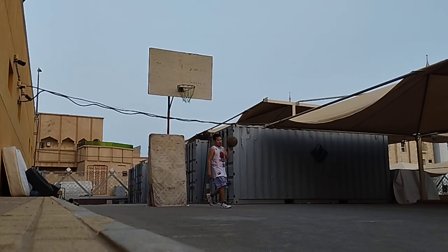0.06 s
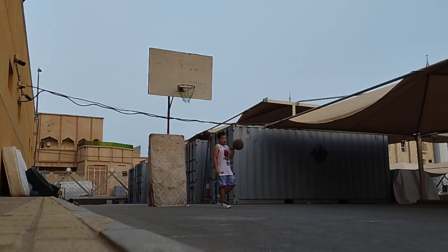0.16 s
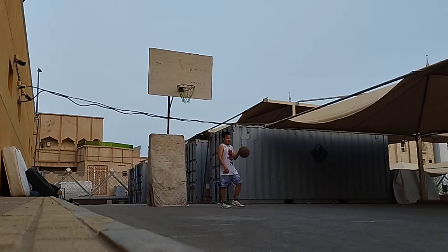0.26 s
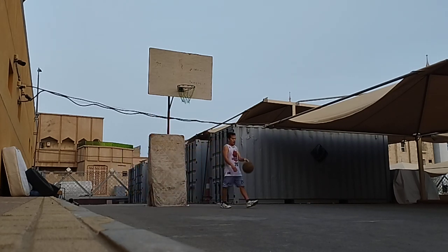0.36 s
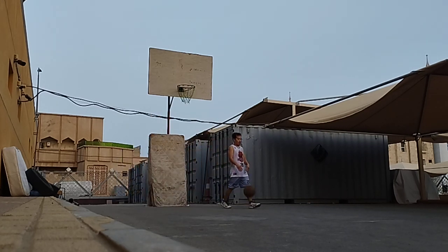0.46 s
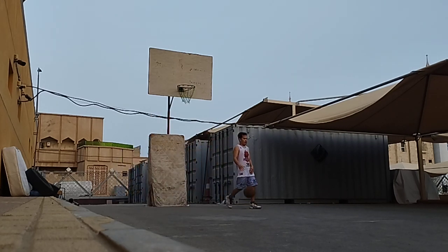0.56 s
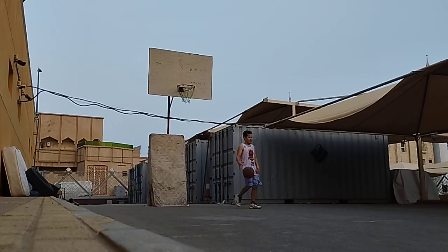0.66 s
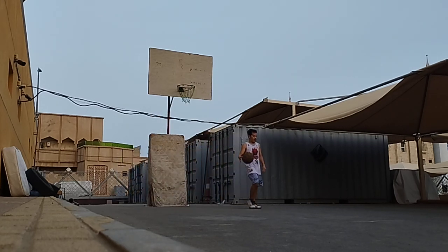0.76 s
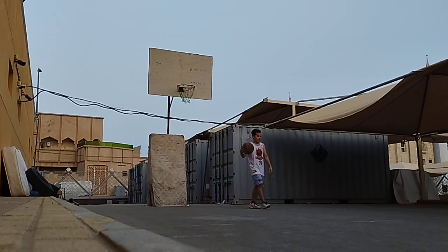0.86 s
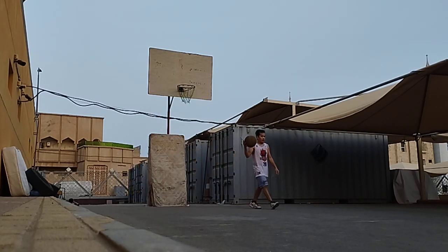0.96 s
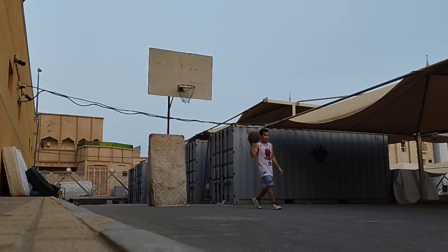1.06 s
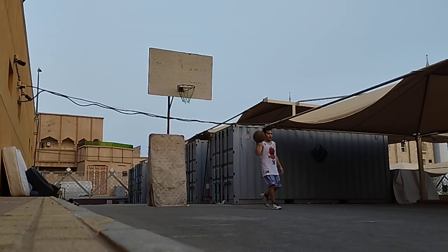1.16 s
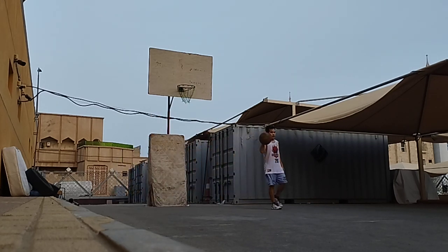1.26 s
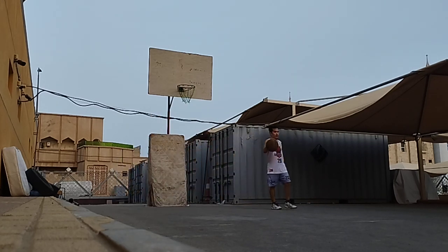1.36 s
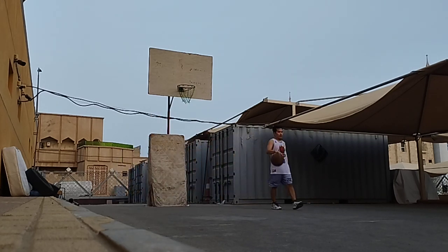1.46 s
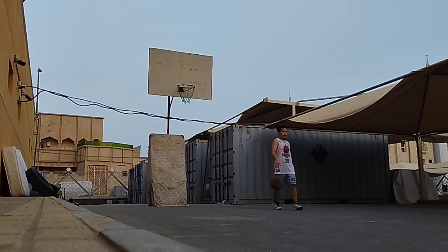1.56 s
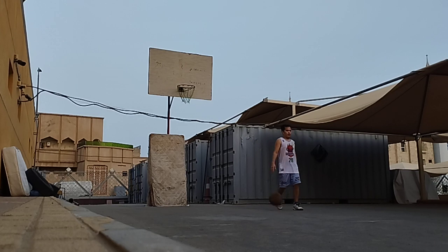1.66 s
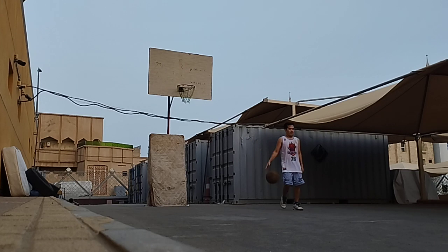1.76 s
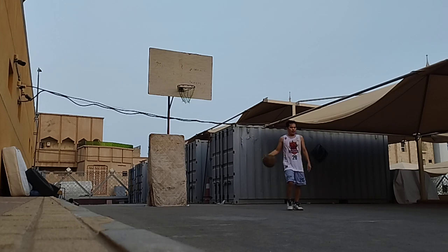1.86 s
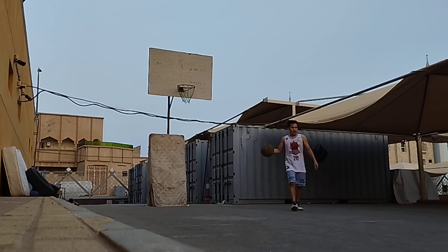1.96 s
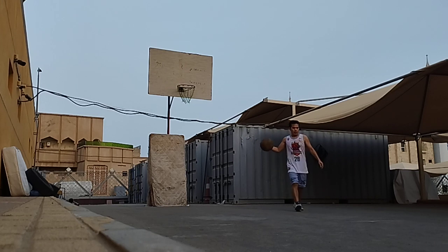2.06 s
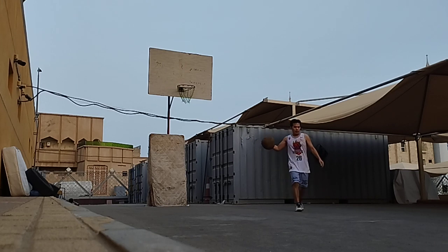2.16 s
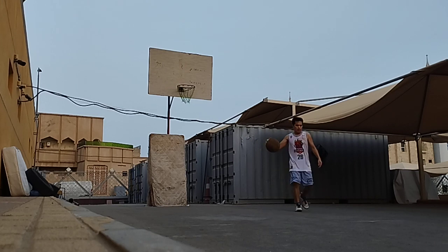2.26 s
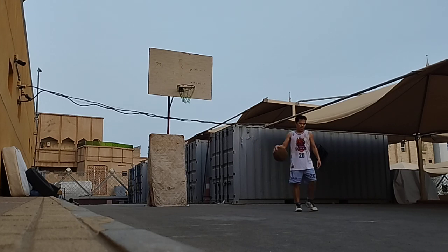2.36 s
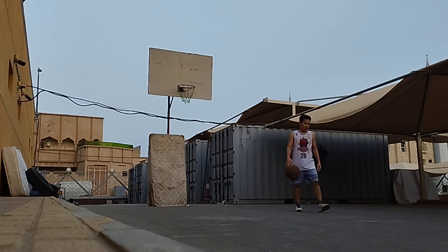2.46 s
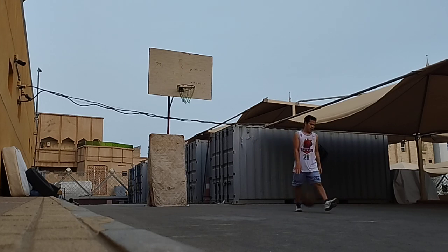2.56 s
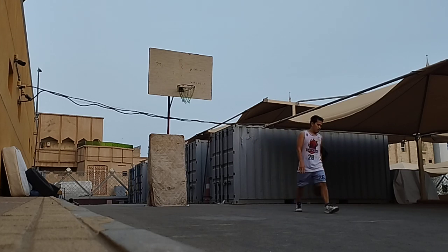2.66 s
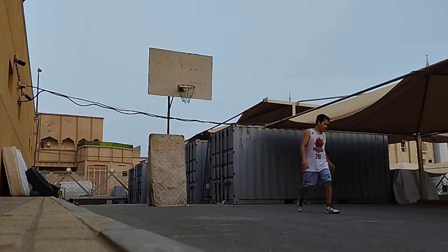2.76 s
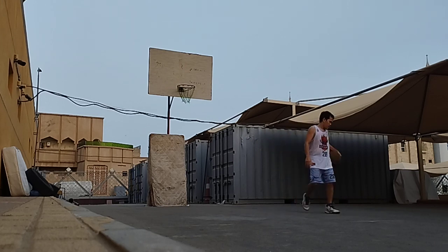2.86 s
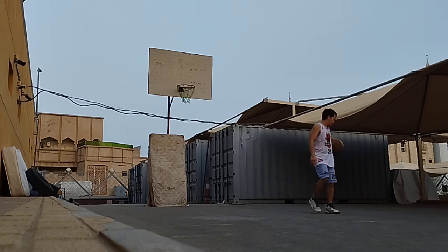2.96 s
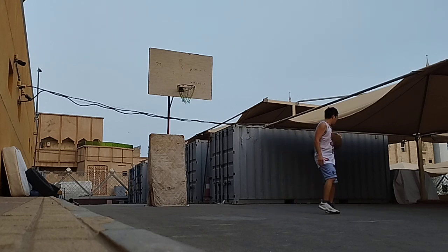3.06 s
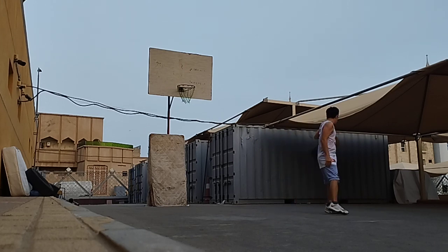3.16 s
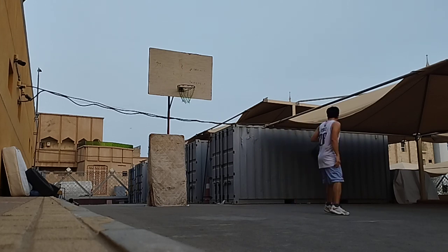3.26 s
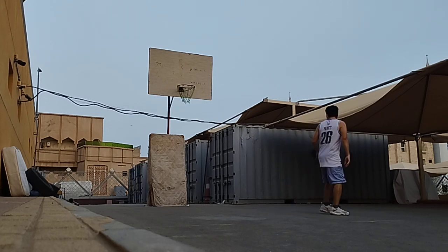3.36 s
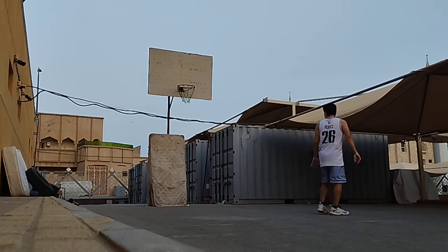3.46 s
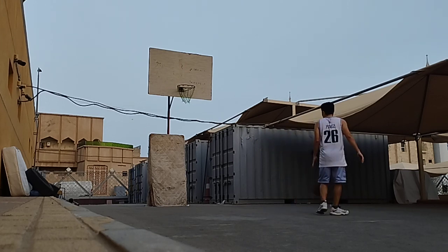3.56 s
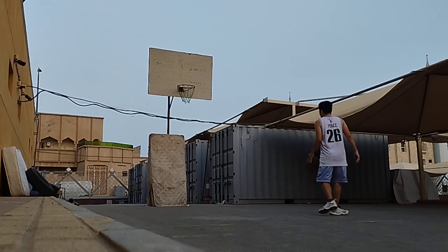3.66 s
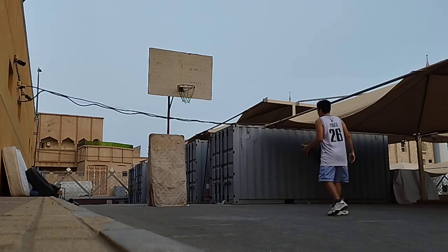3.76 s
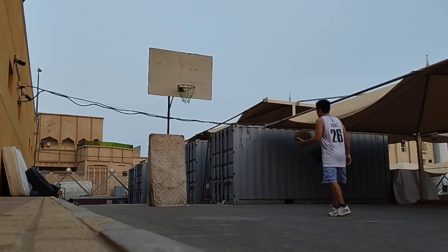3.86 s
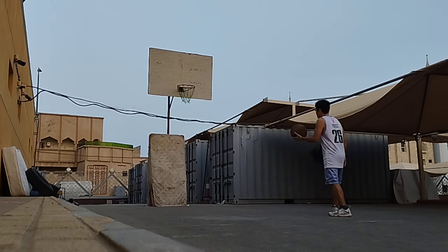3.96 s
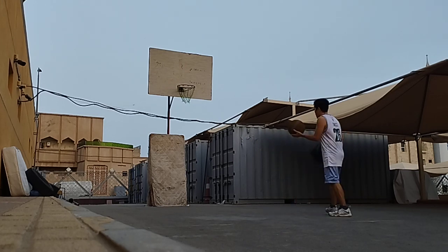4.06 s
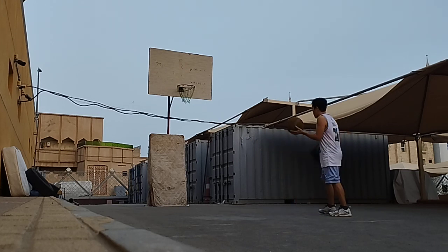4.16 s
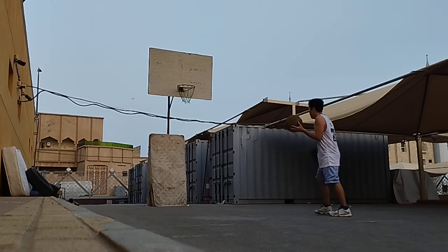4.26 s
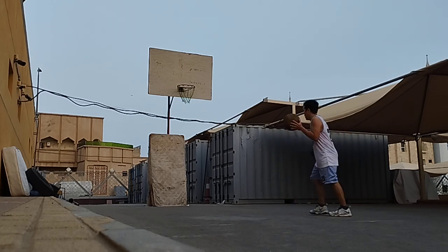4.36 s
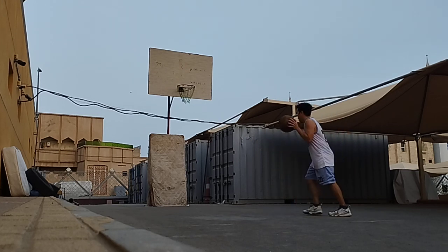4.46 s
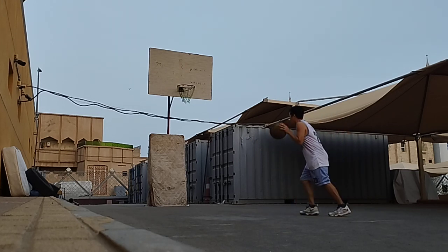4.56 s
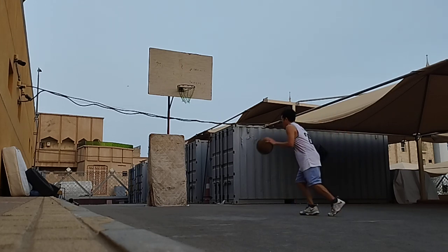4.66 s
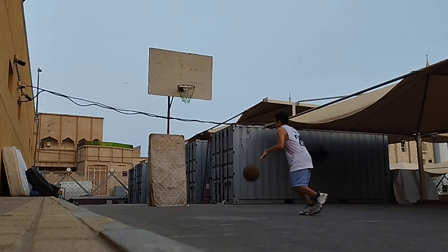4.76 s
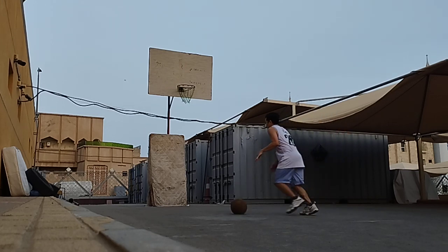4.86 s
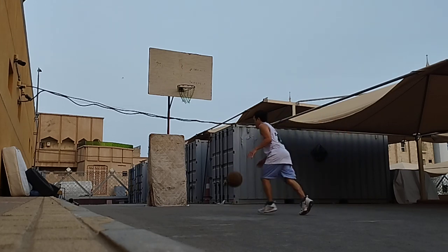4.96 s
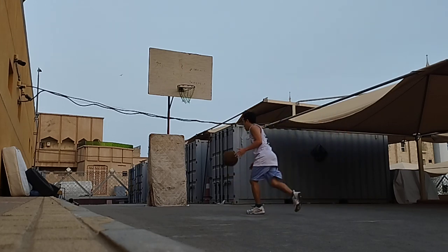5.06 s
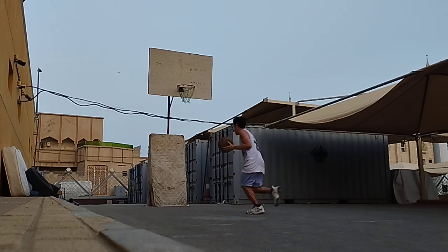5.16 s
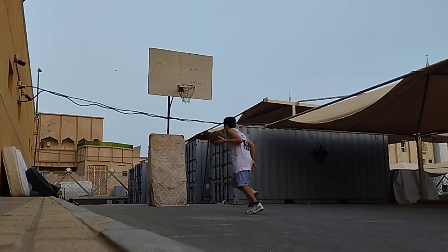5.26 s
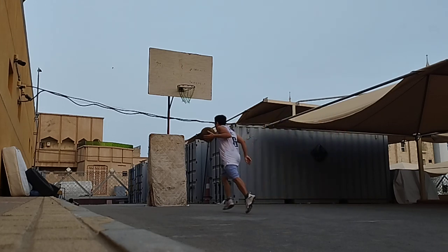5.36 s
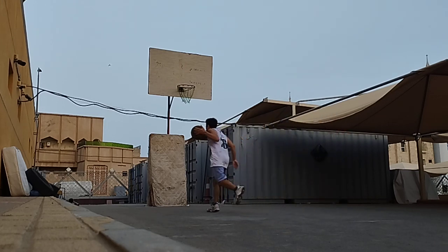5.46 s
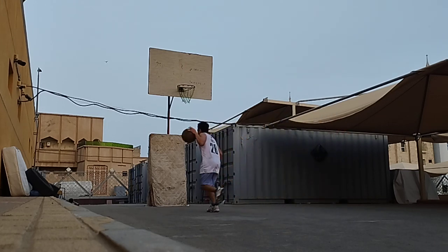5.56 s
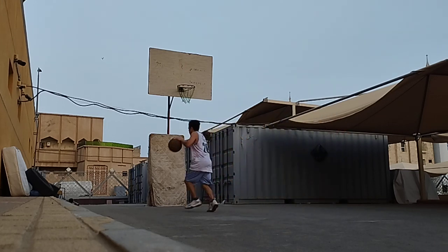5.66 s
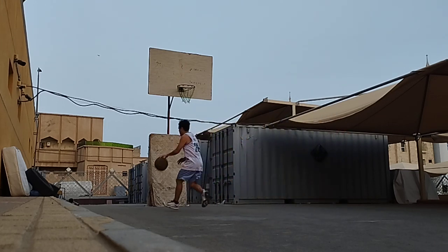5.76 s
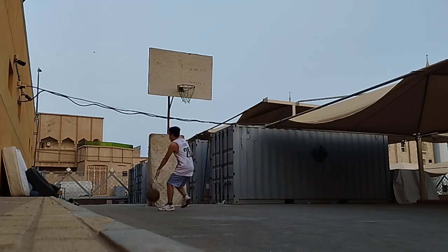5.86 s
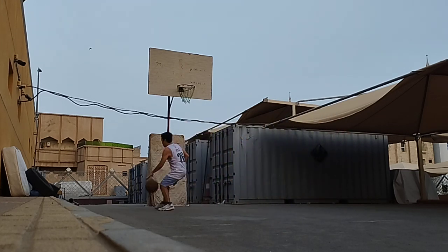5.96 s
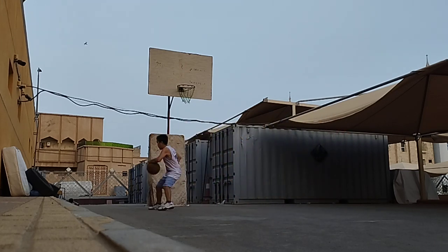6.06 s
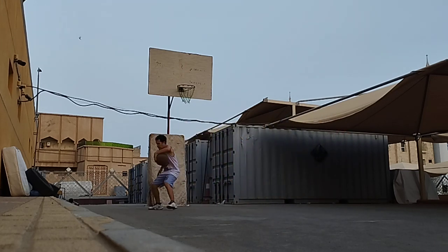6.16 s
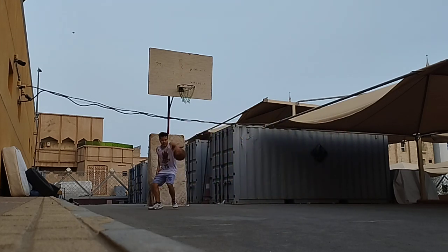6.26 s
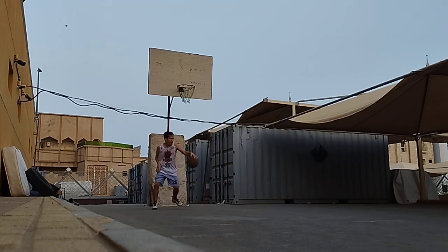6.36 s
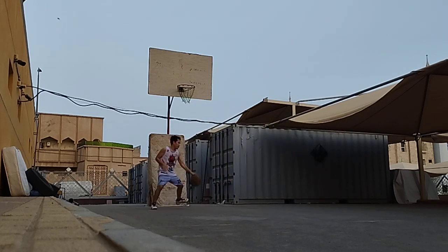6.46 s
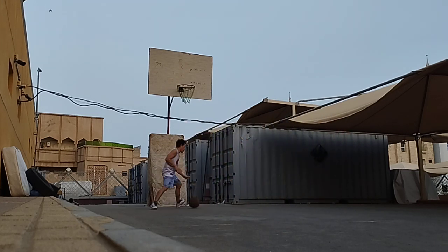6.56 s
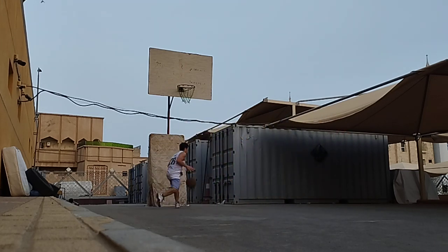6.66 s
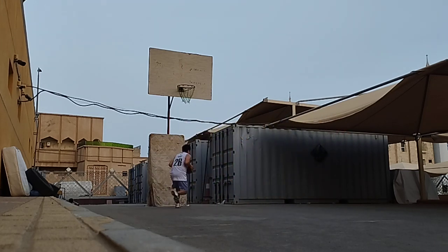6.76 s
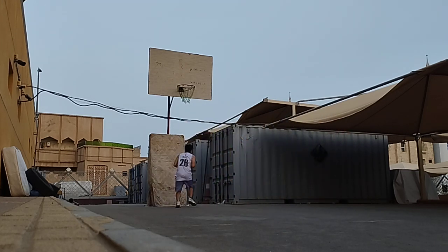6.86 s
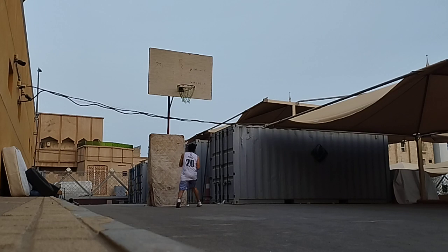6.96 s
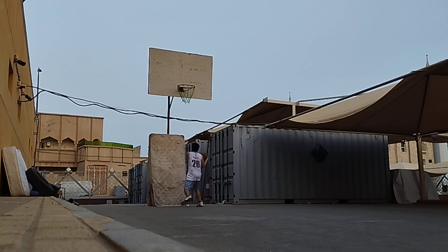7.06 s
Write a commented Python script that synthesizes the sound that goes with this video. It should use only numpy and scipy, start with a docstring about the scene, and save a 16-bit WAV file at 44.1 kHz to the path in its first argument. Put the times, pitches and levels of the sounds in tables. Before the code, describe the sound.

A basketball bounces seven times on hard outdoor concrete, each thump and rubbery slap ringing briefly off nearby walls, over a low town rumble.

```python
"""A basketball is dribbled on an outdoor concrete court, some metres from two close microphones on the ground.
The town hums throughout: filtered noise makes a rumble, a faint wash and a deep throb, strongest near 3.6 s.
Soles tap from the start: short noise bursts. From 0.6 s come seven bounces: a thump of the squashed ball, a
rubber slap and a short ring of shell and air, answered by a steel container and house walls.
From 3.3 s shoes also scuff on the gritty court, and low thuds of noise mark planted heels and one wall echo."""
import sys
import numpy as np
from scipy import signal
from scipy.fft import rfft, irfft, next_fast_len
from scipy.io import wavfile
from scipy.ndimage import map_coordinates

SR = 44100
rng = np.random.default_rng(int(sys.argv[2]) if len(sys.argv) > 2 else 0)


def to_wav(sig):
    """Store sig (one row per channel, or 1-D mono) as 16-bit WAV at the path in sys.argv[1].

    Samples outside -1..1 are clipped; the rate is SR.
    """
    pcm = np.clip(np.atleast_2d(sig), -1, 1) * 32767
    pcm = np.round(pcm).astype(np.int16)
    wavfile.write(sys.argv[1], SR, pcm.T)  # frames by channels


N = 313110  # length in samples, 7.1 s


def amp(db):
    """Turn decibels into a gain."""
    return 10 ** (np.asarray(db) / 20)


def unit(x):
    """Scale to an rms (average strength) of 1."""
    return x / np.sqrt(np.mean(x ** 2) + 1e-20)


def along(points, hz):
    """Read a table of (Hz, value) on a log frequency axis, as pitch is heard."""
    f, v = np.transpose(points)
    return np.interp(np.log(hz + 1), np.log(f + 1), v)


def curve(rows, s):
    """Read a table of (seconds, value) at time s."""
    return np.interp(s, *np.transpose(rows))


def wobble(rate):
    """A smooth random curve with `rate` random points a second."""
    points = rng.standard_normal(int(N * rate / SR) + 4)
    return map_coordinates(points, [np.arange(N) * rate / SR])


def filtered(x, response):
    """Multiply the spectrum of x by a response that depends on frequency."""
    n = x.shape[-1]
    m = next_fast_len(n + SR // 4)  # spare room so the end does not wrap round to the start
    spectrum = rfft(x, m) * response(np.fft.rfftfreq(m, 1 / SR))
    return irfft(spectrum, m)[..., :n]


def causal(points, size=2048):
    """The sharpest click (minimum phase) with the given spectrum, peak 1."""
    cepstrum = irfft(np.log(amp(along(points, np.fft.rfftfreq(size, 1 / SR)))))
    # fold the second half onto the first, so nothing sounds before the hit
    cepstrum[1:size // 2] *= 2
    cepstrum[size // 2 + 1:] = 0
    click = irfft(np.exp(rfft(cepstrum)))
    return click / np.abs(click).max()


def butter(x, hz, kind, order):
    """A high- or low-pass filter that works forward in time."""
    return signal.sosfilt(signal.butter(order, hz, kind, fs=SR, output="sos"), x)


def panned(db):
    """Left and right gains that make the left louder than the right by db."""
    return amp([[db / 2], [-db / 2]])


def add(track, s, sound):
    """Mix a sound into the track at time s."""
    i = max(round(s * SR), 0)
    n = min(sound.shape[-1], N - i)
    track[:, i:i + n] += sound[..., :n]


# How alike left and right are. Each row: frequency in Hz, likeness from -1 (opposite) to 1 (the same).
LEFT_RIGHT_LIKENESS = [(60, 0.99), (130, 0.88), (290, 0.77), (640, 0.21), (1410, -0.21), (3100, 0.16),
                       (6820, -0.11), (15000, -0.031)]


def pair(n):
    """Noise as two close microphones hear it: alike in the bass, nearly unrelated in the treble."""
    def shares(hz):
        turn = np.arccos(np.clip(along(LEFT_RIGHT_LIKENESS, hz), -1, 1)) / 2
        return np.array([np.cos(turn), np.sin(turn)])
    mid, side = filtered(rng.standard_normal((2, n)), shares)
    return np.array([mid + side, mid - side])


def rush(spectrum):
    """Stereo noise coloured by a spectrum, rms 1."""
    return unit(filtered(pair(N), lambda hz: amp(along(spectrum, hz))))


# Spectra of the town's three layers. Each row: frequency in Hz, relative level in dB.
THROB_SPECTRUM = [(10, -27), (22, -9), (31, 0), (34, -3), (40, -10.5), (52, -15), (75, -38), (200, -96)]
RUMBLE_SPECTRUM = [(25, -63), (50, 2.5), (68, 2.5), (115, -2), (160, -8.5), (240, -10.5), (330, -33),
                   (900, -92)]
WASH_SPECTRUM = [(120, -46), (230, 0), (480, -4), (1000, -13.5), (1500, -18.5), (1950, -19.5),
                 (2500, -27.5), (4000, -36.5), (5000, -38), (6300, -43.5), (8000, -50.5), (10500, -52),
                 (13000, -50.5), (16000, -46.5)]
# Loudness of the deep throb over time. Each row: time in seconds, level in dB.
THROB_LEVEL = [(0, -39.5), (1.5, -38.5), (3.6, -33), (4.7, -41.5), (7.1, -38)]
RUMBLE_DB, WASH_DB = -40.5, -48


def town():
    """Distant traffic and machinery: a deep throb that swells and sinks, a rumble and a faint wash."""
    deep = amp(curve(THROB_LEVEL, np.arange(N) / SR)) * rush(THROB_SPECTRUM) * panned(0.85)
    rumble = amp(RUMBLE_DB + 0.93 * wobble(7)) * rush(RUMBLE_SPECTRUM) * panned(0.39)
    wash = amp(WASH_DB + 0.14 * wobble(6.2)) * rush(WASH_SPECTRUM) * panned(0.46)
    return deep + rumble + wash


# light footfalls, uneven in time and weight, louder as time goes on
STEPS_PER_S, STEP_SCATTER_S, STEP_DB, STEP_DB_PER_S, STEP_SCATTER_DB = 2.2, 0.066, -70.5, 1.5, -0.5


def light_steps():
    """The quiet footfalls as rows of time in seconds and level in dB."""
    beats = np.arange(1, 16) / STEPS_PER_S
    late, heavy = rng.standard_normal((len(beats), 2)).T
    times = np.clip(beats + STEP_SCATTER_S * late, 0, (N - 1) / SR)
    levels = STEP_DB + STEP_DB_PER_S * beats + STEP_SCATTER_DB * heavy
    return list(zip(times, levels))


# The clearest taps of soles and of the hand on the ball. Each row: start in seconds, level in dB.
CLEAR_TAPS = [(0.0623, -63.5), (1.5688, -65), (1.6248, -49.5), (3.871, -59.5), (4.0711, -57.5),
              (5.5677, -44), (5.9327, -56.5), (6.3944, -58.5), (6.847, -56)]
# Soles sliding on grit. Each row: start in seconds, level in dB, length in seconds.
SOLE_SCUFFS = [(3.3, -64, 0.09), (3.376, -55.5, 0.073), (3.93, -66, .14), (4.614, -65.5, 0.092),
               (5.151, -53.5, 0.027), (5.565, -46.5, 0.031), (5.727, -61.5, 0.053), (6.103, -60.5, 0.077),
               (6.488, -49, 0.044), (6.624, -62.5, .06), (6.688, -55.5, 0.086), (7.079, -46.5, 0.044)]
# Low thuds: heels planted hard and, at 3.738, a house wall's low echo of the bounce.
# Each row: start in seconds, level in dB.
LOW_THUDS = [(3.738, -42), (5.153, -42), (5.959, -32.5), (6.883, -36.5)]
# Spectra of a tap, a scuff and a low thud. Each row: frequency in Hz, relative level in dB.
TAP_SPECTRUM = [(200, -14), (2000, -6), (3500, 0), (5000, 1.5), (7000, 1.5), (8500, -16), (11000, -17),
                (13000, -1.5), (16000, -19)]
GRIT_SPECTRUM = [(200, -17), (1000, 3), (2100, -0.5), (2900, -2.5), (6300, -6), (8200, -20), (11000, -22),
                 (13000, -14), (16000, -16)]
THUD_SPECTRUM = [(100, -22), (300, 5), (700, -2), (1200, -12), (2500, -32), (8000, -47)]
TAP_T60_S, THUD_T60_S = 0.039, 0.049  # t60: time to fade by 60 dB
BITE_SHARE, SLIDE_SHARE, RELEASE_SHARE = .2, 0.89, 1.5  # a scuff's attack, end of slide and t60 over its length


def footwork_and_thuds():
    """Taps, scuffs over loose grit and low thuds (heels, one wall echo): noise shaped by short, fading levels."""
    t = np.arange(SR // 4) / SR
    touch, drag, thud = np.zeros((3, 1, N))
    for s, db in CLEAR_TAPS + light_steps():
        add(touch, s, amp(db - 60 * t / TAP_T60_S))
    for s, db, length in SOLE_SCUFFS:
        # the sole bites, slides and lets go; loose grains roll on
        bite = np.clip(t / (BITE_SHARE * length), 0, 1)
        after = np.maximum(t - SLIDE_SHARE * length, 0)
        add(drag, s, bite * amp(db - 60 * after / (RELEASE_SHARE * length)))
    for s, db in LOW_THUDS:
        add(thud, s, amp(db - 60 * t / THUD_T60_S) * (1 - np.exp(-t / 0.00061)))
    # grains catch and break loose unevenly
    grit = unit(rush(GRIT_SPECTRUM) * amp(3.2 * wobble(600) + 2.8 * wobble(70)))
    near = drag * grit + touch * rush(TAP_SPECTRUM) + thud * rush(THUD_SPECTRUM)
    return near + yard(near, tail_db=-13.5)[:, :N]


# Echoes of the container and the house walls. Each row: delay in seconds, relative level in dB,
# fading time in seconds (to 37 percent).
WALL_ECHOES = [(.008, -18, 0.014), (.036, -16.5, 0.0074), (0.055, -18.5, .014), (.1, -38, 0.0055),
               (.122, -25.5, .01), (0.158, -24, 0.016)]
# How long the tail lasts. Each row: frequency in Hz, time to fade by 60 dB in seconds.
TAIL_T60 = [(100, 0.56), (500, 0.87), (1200, 0.72), (4000, 0.76), (12000, 0.53)]
# Tone of all the echoes. Each row: frequency in Hz, gain in dB.
ECHO_COLOUR = [(60, -18.5), (150, 2), (400, -7.5), (700, -3), (1150, -1.5), (2000, 1.5), (3200, 2.5),
               (6000, -5.5), (14000, -6)]


def yard(x, tail_db):
    """Scattered echoes from the ribbed container and the walls, with a thin tail: bursts of fading noise."""
    hz, s, z = signal.stft(pair(SR * 3 // 4), SR, nperseg=256)
    fade = amp(-60 * s / along(TAIL_T60, hz)[:, None])
    tail = signal.istft(z * fade, SR, nperseg=256)[1]
    t = np.arange(tail.shape[1]) / SR
    tail = tail * (1 - np.exp(-t / 0.0025))
    answer = amp(tail_db) * tail / np.linalg.norm(tail[0])
    for delay, db, spread in WALL_ECHOES:
        echo = rng.standard_normal(tail.shape) * np.exp(-np.abs(t - delay) / spread) * (t > delay)
        answer += amp(db) * echo / np.linalg.norm(echo[0])
    # long waves reach both microphones alike
    shared = filtered(answer[0] - answer[1], lambda f: 1 / (1 + (f / 600) ** 2))
    answer = filtered(answer + [[0], [1]] * shared, lambda f: amp(along(ECHO_COLOUR, f)))
    return signal.fftconvolve(x, answer, axes=1)


def thump(t, contact, skew, edge_hz):
    """The ball flattens and springs back; the air feels the acceleration of its volume."""
    dent = np.sin(np.pi * np.clip(t / contact, 0, 1) ** max(skew, 1)) ** 2
    # the rubber loses some energy, and peels off the ground more gently than it lands
    peel = np.clip((1 - t / contact) / 0.056, 0, 1) * np.exp(-.35 * t / contact)
    push = -np.diff(np.pad(dent, (2, 0)), 2) * peel
    wave = butter(push, edge_hz, "low", order=1)
    wave = butter(wave, 63, "high", order=2)
    wave = butter(wave, 3800, "low", order=2)
    return wave / np.abs(wave).max()


def ring(modes, t, scatter_db, spread):
    """Fading tones; each blow lands on another spot of the ball and shares them out anew."""
    out = np.zeros((2, len(t)))
    for hz, db, t60 in modes:
        phase = rng.uniform(0, 2 * np.pi) + spread * rng.standard_normal((2, 1))
        level = amp(db + scatter_db * rng.normal() - 60 * t / t60)
        out += level * np.sin(2 * np.pi * hz * t + phase)
    return out


def burst(x):
    """Scale a stereo blow to the energy of 10 ms at rms 1 in each channel, on average."""
    return x / np.sqrt(np.sum(x ** 2) / (SR * .02))


# Tones of the rubber shell. Each row: frequency in Hz, relative level in dB, time to fade by 60 dB in seconds.
SHELL_MODES = [(223.2, -2, 0.056), (359.6, 3.5, 0.033), (437.3, -6, 0.096), (560, -3, 0.046)]
SHELL_DB_PER_OCTAVE = 7.5  # the spot that lands favours the tones near its centre


def shell(t, contact, centre_hz):
    """The rubber swings freely once it has left the ground, and its pitch rises as the ball rounds out."""
    clock = t - 0.0017 * (1 - np.exp(-t / 0.024))  # starts slow, so the pitch starts low
    free = np.clip(t / contact, .35, 1) * (1 - np.exp(-t / 0.0023))
    modes = [(hz, db - SHELL_DB_PER_OCTAVE * abs(np.log2(hz / centre_hz)), t60) for hz, db, t60 in SHELL_MODES]
    swing = ring(modes, clock, scatter_db=2, spread=.3)
    return burst(swing * free)


# Tones of the air in the ball. Each row: frequency in Hz, relative level in dB, time to fade by 60 dB in seconds.
AIR_MODES = [(700, 3.5, 0.017), (859, 9.5, 0.016), (962, -7.5, 0.049), (1075, 4, 0.033), (1208, 3, 0.023),
             (1370, 0, 0.023), (1673, -1, 0.024), (1966, -2.5, 0.02), (2210, -12, 0.013),
             (2720, -16, 0.025), (974, -27, 1), (1036, -34, 0.97), (2870, -40, 1)]


def ping(t, centre_hz, contact, lift_db):
    """The air inside is struck at touch-down, smothered while the ball is flat and struck again at lift-off."""
    modes = [(hz, db - min(14 * abs(np.log2(hz / centre_hz)), 6), t60) for hz, db, t60 in AIR_MODES]
    down, up = [ring(modes, t, scatter_db=2, spread=.75) for _ in range(2)]
    down = down * (1 - np.exp(-t / 0.00074)) * np.exp(-(t / (1.4 * contact)) ** 2)
    up = up * (1 - np.exp(-t / 0.0029))
    wait = round(0.88 * contact * SR)  # samples until lift-off
    up = np.pad(up, ((0, 0), (wait, 0)))[:, :len(t)]
    return (burst(down) + amp(lift_db) * burst(up)) / np.hypot(1, amp(lift_db))


# Spectra of the deeper crack and the brighter slap. Each row: frequency in Hz, relative level in dB.
CRACK_SPECTRUM = [(100, 1), (600, -3), (1200, 5), (2000, 10), (3500, -1.5), (4500, 4.5), (8000, -50.5),
                  (16000, -66.5)]
SLAP_SPECTRUM = [(100, -80), (400, 16.5), (1200, -31), (2000, 4), (3000, -3), (5200, -4), (7000, -10.5),
                 (8200, -20.5), (11000, -23.5), (13000, -16.5), (16000, -40)]


def slap(t, colour, grain, t60):
    """Rubber meets concrete: a sharp click and a few milliseconds of crackle as the contact spreads."""
    noise = rng.standard_normal(len(t)) + 0.44 * rng.standard_normal((2, len(t)))
    blow = grain * noise * amp(-60 * t / t60)
    blow[:, 0] += 1  # the click
    return signal.fftconvolve(blow, causal(colour)[None], axes=1)[:, :len(t)]


# levels of the parts of a bounce, before force, slant and sharpness change them
THUMP_DB, SHELL_DB, PING_DB, PATCH_DB, CRACK_DB, SLAP_DB = -11, -21, -27, -28.5, -23, -26
CRACK_PER_SHARPNESS = 2.94  # the crack grows faster than the slap (dB per dB)
CONTACT_S, CONTACT_S_PER_DB, SLANT_CONTACT_S = .0119, .00028, 0.0011  # hard or slanting: less time on the ground
# a slanting ball squeezes late and softly, and leaves the ground with less ring
SLANT_SKEW, EDGE_HZ, SLANT_EDGE_OCTAVES = 0.78, 192, 2.7
SLANT_SHELL_DB, LIFT_DB, SLANT_LIFT_DB = -17.5, -4, -3
MIC_SPACING_M, SOUND_M_PER_S = 0.058, 343
ECHO_DB, ECHO_CRACK_DB, ECHO_SLAP_DB = 0.3, 6.5, 9.5  # sent to the walls, which get more crack and slap
HOUSE_S, HOUSE_DB, HOUSE_SLAP_DB = .1, -23, -29.5  # house front's echo: delay, gain of thump, gain of air and slap
# Where the player is, seen from the microphones. Each row: time in seconds, degrees to the right.
PLAYER_PATH = [(0, 2.5), (3.2, 20), (5, -4), (6, -11.5), (7.1, -11)]
# The bounces. Each row: start in seconds, force in dB, slant from 0 (dropped straight) to 1 (pushed on the run),
# sharpness of the slap in dB, centre of the shell tones in Hz, centre of the air tones in Hz,
# ring of the first patch to land in Hz.
BALL_BOUNCES = [(0.6379, 0, 0.28, -2, 520, 1010, 1950), (1.763, -1.5, 0.15, 2, 239, 1060, 2840),
                (2.7108, -4.5, 0.13, 1.15, 370, 1220, 2730), (3.614, -2.5, .03, -0.5, 320, 670, 1240),
                (4.9825, 0, 0.37, 1, 393, 1010, 5700), (6.0181, 3.5, 0.58, 0, 200, 890, 3480),
                (6.6857, -1.5, 0.84, 0, 560, 1070, 1290)]


def dribble():
    """Every bounce thumps, slaps and rings, and the yard answers it; force and slant set how it lands."""
    out, t = np.zeros((2, N)), np.arange(SR // 2) / SR
    for s, force_db, slant, sharp_db, shell_hz, centre_hz, patch_hz in BALL_BOUNCES:
        contact = CONTACT_S - CONTACT_S_PER_DB * force_db - SLANT_CONTACT_S * slant
        skew, edge_hz = 1 + SLANT_SKEW * slant ** 2, EDGE_HZ * 2 ** (-SLANT_EDGE_OCTAVES * slant)
        low = amp(THUMP_DB) * thump(t, contact, skew, edge_hz) * panned(2.5)
        rubber = amp(SHELL_DB + SLANT_SHELL_DB * slant) * shell(t, contact, shell_hz)
        air = amp(PING_DB) * ping(t, centre_hz, contact, LIFT_DB + SLANT_LIFT_DB * slant) * panned(3.1)
        body = low + rubber + air

        # the patch of rubber that hits first rings for a moment
        patch = amp(PATCH_DB - 60 * t / 0.0082) * np.sin(2 * np.pi * patch_hz * t)
        crack_db, slap_db = CRACK_DB + CRACK_PER_SHARPNESS * sharp_db, SLAP_DB + sharp_db
        crack = amp(crack_db) * slap(t, CRACK_SPECTRUM, grain=0.11, t60=0.018)
        crack = (crack + patch) * panned(-2.0)
        smack = amp(slap_db) * slap(t, SLAP_SPECTRUM, grain=0.15, t60=0.021) * panned(-5.0)

        # the player's bearing delays one microphone against the other
        lag = MIC_SPACING_M * np.sin(np.radians(curve(PLAYER_PATH, s))) / SOUND_M_PER_S
        bearing = lambda hz: np.exp(1j * np.pi * hz * lag * np.array([[-1], [1]]))
        add(out, s + 0.00029, amp(force_db) * filtered(body + crack + smack, bearing))

        # the walls catch the slap from every side, so its crackle evens out to a plain click
        click = amp(crack_db + ECHO_CRACK_DB) * causal(CRACK_SPECTRUM)
        click = click + amp(slap_db + ECHO_SLAP_DB) * causal(SLAP_SPECTRUM)
        to_walls = body + np.pad(click, (0, len(t) - len(click)))
        add(out, s, amp(force_db + ECHO_DB) * yard(to_walls, tail_db=-14))

        # a flat house front returns the bounce in one piece
        house = amp(force_db + HOUSE_DB) * low + amp(force_db + HOUSE_SLAP_DB) * (air + crack + smack)
        add(out, s + HOUSE_S, house)
    return out


def scene():
    """The town around the court, the shoes with the low thuds, and the ball."""
    return town() + footwork_and_thuds() + dribble()


def record(dry):
    """Nothing above 16100 Hz is kept."""
    return filtered(dry, lambda hz: hz < 16100)


dry = scene()
out = record(dry)
to_wav(out)
```